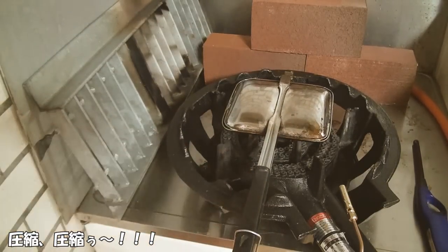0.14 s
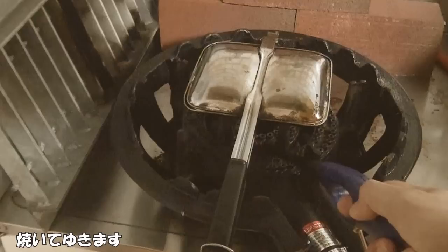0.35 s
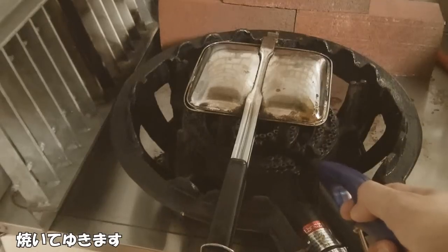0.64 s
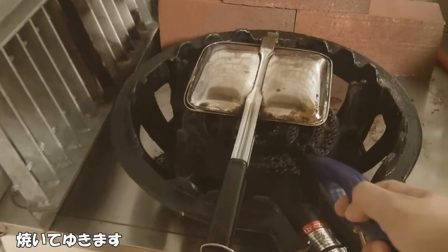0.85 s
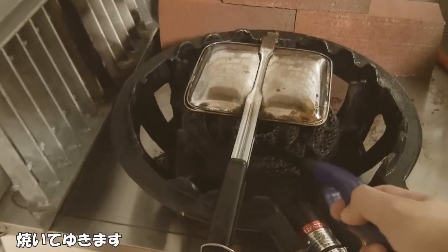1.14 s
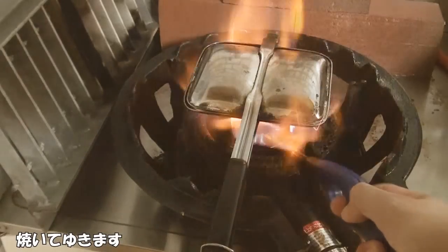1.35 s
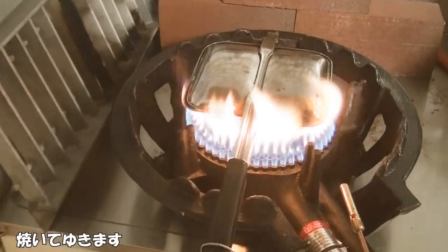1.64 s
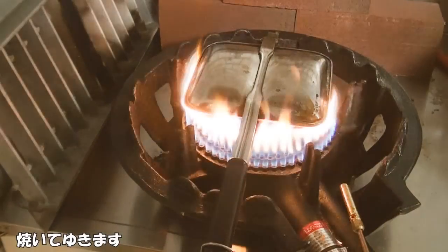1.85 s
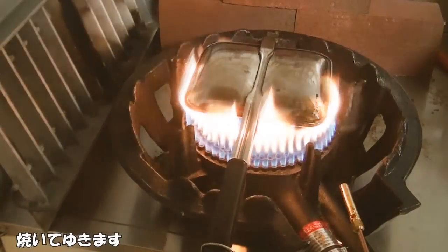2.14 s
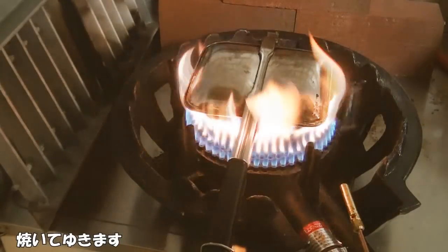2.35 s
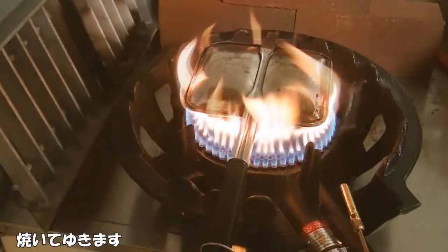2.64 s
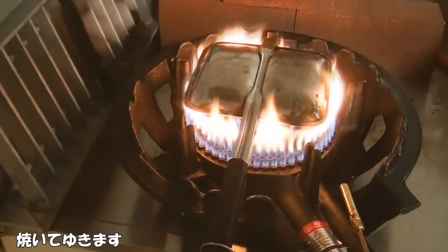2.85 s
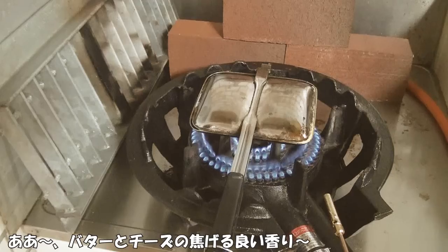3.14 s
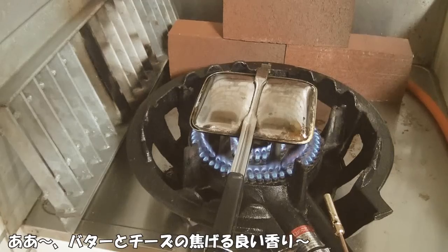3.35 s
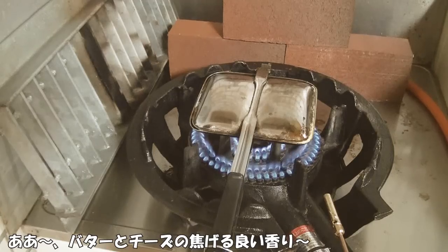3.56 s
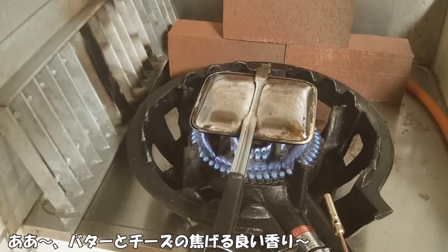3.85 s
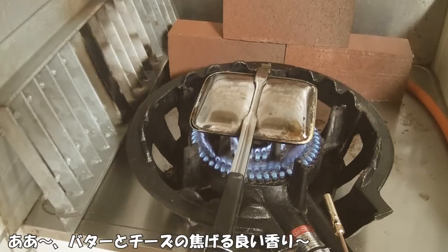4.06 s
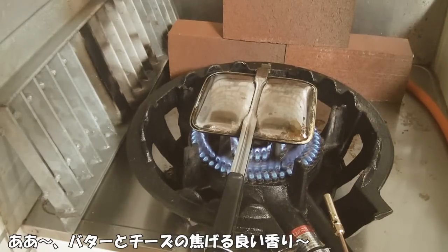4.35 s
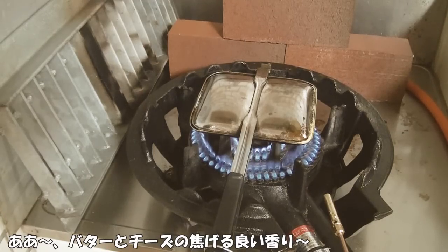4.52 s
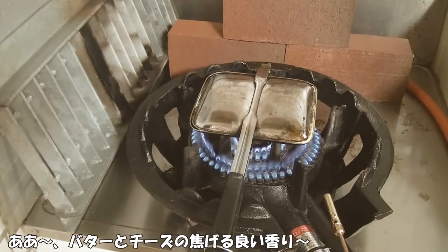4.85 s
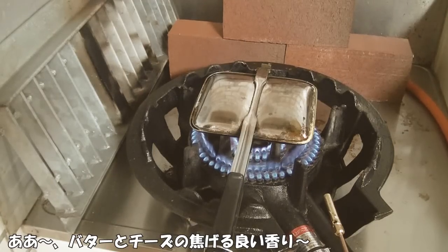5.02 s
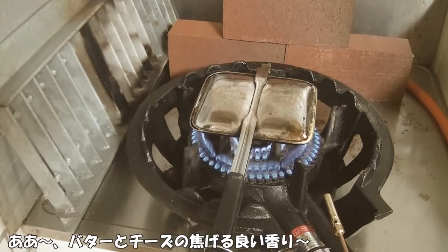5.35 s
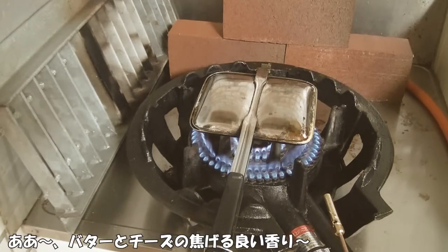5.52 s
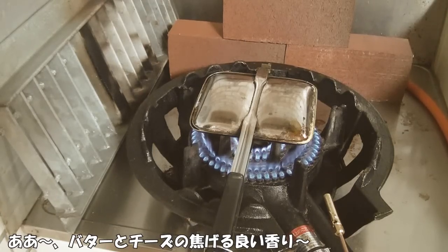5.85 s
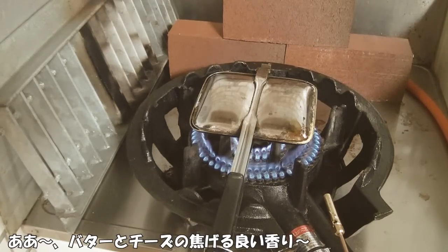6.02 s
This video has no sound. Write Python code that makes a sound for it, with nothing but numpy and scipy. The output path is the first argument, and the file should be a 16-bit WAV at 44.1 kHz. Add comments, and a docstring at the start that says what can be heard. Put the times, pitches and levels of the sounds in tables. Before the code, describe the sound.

Soft ventilation hums throughout in a steel-lined kitchen corner. At about 0.3 seconds a plastic lighter is picked up with a knock and a light rub, and gas starts hissing faintly around 0.5 seconds. The lighter snaps close by at 0.7, 1.0 and 1.3 seconds, each sharp crack leaving a short metallic echo, with small trigger clicks between. On the third snap the gas catches with a brief, deep whoomph, followed by a metal knock. From 1.7 to 2.7 seconds flames flutter in low gusts while the jet hisses and half whistles. At about 3.1 seconds fat begins sizzling in a sandwich iron, with fine crackles and irregular sharp pops, strongest near 3.9 seconds and again from 5.2 onward. Metal knocks clearly at 4.1 seconds, faintly at 4.7, and again at 6.1, as the sizzle grows slightly louder.

```python
"""A cast sandwich iron lies on a ring burner in a steel-lined kitchen corner; ventilation hums softly.
A piezo lighter is picked up with a knock, the gas starts to hiss, and the lighter snaps three times.
On the third snap the pooled gas catches with a whoomph; tall flames flutter and the jet half whistles.
From about 3 s, on a low flame, butter and cheese sizzle and spit in the iron as bubbles and drops
of fat burst, while the metal knocks now and then."""
import sys
import numpy as np
from scipy import signal
from scipy.fft import rfft, irfft, next_fast_len
from scipy.io import wavfile
from scipy.ndimage import uniform_filter1d

SR = 44100
rng = np.random.default_rng(int(sys.argv[2]) if len(sys.argv) > 2 else 0)


def materialize(psi):
    """Save the field psi as 16-bit PCM at rate SR to the path in sys.argv[1].

    A 1-D psi becomes a single channel; in a 2-D psi each row is a channel.
    """
    bounded = np.clip(np.atleast_2d(psi).T, -1, 1)
    quanta = np.round(bounded * 32767).astype(np.int16)
    wavfile.write(sys.argv[1], SR, quanta)


N = 272538

GAS_ON_S, FULL_FLAME_S, FRYING_S = .46, 1.69, 3.097
# how hard the fat is frying: (time [s], level [dB])
FRYING_STRENGTH = [(3.1, -41), (3.5, -40.5), (4.0, -37), (4.34, -42), (4.7, -38), (5.42, -40),
                   (5.85, -37.5), (6.18, -35.5)]


def lighter():
    """A tiny hammer cracks against a crystal, and the steel walls throw the sound back."""
    # hammer blows: (time [s], level [dB])
    snaps = [(0.6542, -2.5), (1.0125, -2.5), (1.3238, -2.5)]
    # tone of the crack and of its echo: (frequency [Hz], level [dB])
    crack_tone = [(570, -45), (1370, -7.5), (1640, -6.5), (2650, -2.5), (3210, -19), (3530, -4),
                  (4050, -3.5), (5870, -5.5), (8390, -6.5), (11300, -11), (12300, -20), (16000, -12)]
    echo_tone = [(550, -56), (944, -26), (1110, -13.5), (1510, -15.5), (1780, -5), (2610, -0.5),
                 (2910, -8.5), (4280, -6), (5870, -4), (7110, -8), (8860, -7.5), (12500, -21), (16000, -24)]
    # notes at which the steel rings: (frequency [Hz], level [dB])
    steel_notes = [(1927, -51), (2568, -40), (2638, -38), (4393, -34), (5335, -34), (5744, -40)]
    slap_delay_s, ring_fade_s = 0.026, 0.31
    blows = impulses(*np.transpose(snaps))
    crack = from_db(-8.5) * tint(bursts(blows, fade_s=.1), crack_tone)
    echo = from_db(20.5) * tint(kitchen(blows, build_s=0.02), echo_tone)
    # a hollow slap comes back a moment later and leaves the steel ringing
    late = np.roll(blows, int(slap_delay_s * SR))
    slap = from_db(-10) * bursts(late, fade_s=0.077) + from_db(10) * kitchen(late, build_s=0.019)
    hollow = resonate(slap, [(2020, 93, -9), (2660, 150, -9.5)])
    t = clock()[:SR]
    notes = sum(from_db(db) * np.sin(2 * np.pi * hz * t) for hz, db in steel_notes)
    ring = notes * np.minimum(t / slap_delay_s, 1) * from_db(11.5 - 60 * t / ring_fade_s)
    return off_sheets(crack + echo + hollow) + signal.fftconvolve(blows, ring)[:N]


def whoomph():
    """The pooled gas catches, blazes for a moment, collapses and leaves a low rumble."""
    # tone of the blaze: (frequency [Hz], level [dB])
    blaze_tone = [(15, -48), (25, -6), (100, -6), (140, 5.5), (232, -13.5), (296, 3.5), (365, -10),
                  (490, -7), (625, -23.5), (770, -9.5), (960, -16.5), (1600, -23), (2080, -49),
                  (3520, -120)]
    catch = dict(start_s=1.3236, rise_s=0.039, length_s=0.069)
    blaze = from_db(-11.5) * envelope(**catch, fall_db_per_s=367)
    rumble = from_db(-26) * envelope(**catch, fall_db_per_s=107)
    fire = np.hypot(blaze, rumble) * evened(tint(air(side_db=-5.5), blaze_tone), span_s=0.0155)
    # its bass piles up along the steel wall on the left
    bass = signal.sosfilt(signal.butter(1, 150, fs=SR, output="sos"), fire.mean(axis=0))
    return fire * from_db([[-.6], [.6]]) + from_db(-7.5) * bass * [[1], [-1]]


def flames():
    """Tall flames flap around the iron in short gusts."""
    # gusts: (time [s], length [s], level [dB], extra roar above 300 Hz [dB])
    gusts = [(1.682, 0.019, -39, 7), (1.809, 0.087, -40.5, -4.5), (1.913, 0.046, -33, 3),
             (2.051, 0.018, -32.5, -7), (2.33, 0.089, -40, 3.5), (2.453, 0.036, -42, -14),
             (2.521, 0.04, -36.5, -15), (2.59, 0.045, -36, 4.5)]
    # tone of the flames: (frequency [Hz], level [dB])
    flame_tone = [(15, -51), (25, -1), (53, -6), (145, 4), (179, 4.5), (216, -8), (372, -13), (532, -12),
                  (600, -25), (780, -24), (1500, -34), (5000, -46)]
    swells = np.array([from_db(db) * envelope(s, rise_s=0.014, length_s=length_s, fall_db_per_s=330)
                       for s, length_s, db, _ in gusts])
    roars = swells * from_db(np.array(gusts)[:, -1:])
    flapping = from_db(2 * drift(per_s=78))
    burning = flapping * evened(tint(air(side_db=-28), flame_tone), span_s=0.019)
    low = signal.sosfiltfilt(signal.butter(3, 300, fs=SR, output="sos"), burning)
    return swells.max(axis=0) * low + roars.max(axis=0) * (burning - low)


def frying():
    """Drops of fat pop above the sizzle, and each big one shakes the iron."""
    # big drops bursting: (time [s], level [dB], sharp treble relative to the pop [dB])
    big_drops = [(3.291, -14, -14), (3.3925, -23, 3), (3.409, -12, -9), (3.6196, -3.5, -18),
                 (3.66, -9, -15), (3.784, -14, -11), (3.8604, -0.5, -25), (3.9199, 3, -27),
                 (4.098, -3, -20), (4.174, -10, -32), (4.7907, -14, -16), (4.918, -8, -16),
                 (5.0874, -6.5, -16), (5.221, -2.5, -19), (5.291, -9, -14), (5.364, -12, -8),
                 (5.5434, -2, -7), (5.732, -3.5, -7), (5.74, -9.5, 1), (5.7808, -9, -6),
                 (5.8853, -14.5, -6), (5.9114, -7, -13), (6.0625, -10, -10), (6.112, 0, -9)]
    # tone of a pop: (frequency [Hz], level [dB])
    pop_tone = [(80, -35), (500, -20), (2000, -10), (4500, 3), (7800, 7), (11000, 2), (15500, -8.5)]
    s, db, treble_db = np.transpose(big_drops)
    big_pops = impulses(s, db)
    bubbling = sizzle(big_pops)
    drops = big_pops + crackle(big_pops)
    spatter = from_db(-19) * bursts(drops, fade_s=0.008)
    pops = from_db(-1) * tint(drops + spatter, pop_tone)
    treble = resonate(bursts(impulses(s, db + treble_db), fade_s=0.0058), [(14300, 3500, 0)])
    sharp_pops = pops + resonate(treble, [(14300, 3500, -13)])
    iron = resonate(bursts(big_pops, fade_s=0.076), [(1330, 1400, -36)])
    echo = from_db(-8.5) * kitchen(sharp_pops, build_s=0.003)
    return bubbling + off_sheets(sharp_pops) + iron + echo


def sizzle(big_pops):
    """Countless tiny bubbles burst and steam spits from the seam; each big pop lets out more."""
    # tone of the sizzle: (frequency [Hz], level [dB])
    sizzle_tone = [(300, -19), (600, -10.5), (1100, -4), (2100, -8), (2900, -1), (3800, -5.5), (5200, -6),
                   (8200, -0.5), (11200, -6.5), (12700, -7), (13600, -4.5), (16000, -6.5)]
    # pitches at which the gap in the iron rings: (frequency [Hz], width [Hz], level [dB])
    iron_gap = [(4500, 170, -4.5), (5820, 440, -5), (7480, 150, -6), (8350, 140, -3.5), (9980, 200, -7)]
    steam = from_db(-34.5) * die_away(big_pops, fade_s=0.19)
    strength = np.hypot(level(FRYING_STRENGTH) * after(FRYING_S), steam)
    sizes = from_db(6.3 * np.minimum(rng.exponential(1, N), 5)) * rng.choice([-1, 1], N)
    bubbles_per_s = 1000 * from_db(3 * drift(per_s=45))
    bubbles = rms_one(sizes * (rng.random(N) < bubbles_per_s / SR))
    # steam lets go at uneven intervals, in puffs that swell and fade within milliseconds
    spit_s = np.cumsum(rng.uniform(.003, .035, 500))
    spit_s = spit_s[spit_s < N / SR]
    releases = impulses(spit_s, rng.uniform(-12, 0, len(spit_s)))
    decay = np.exp(-1 / (0.0015 * SR))
    puffs = signal.lfilter([1], [1, -2 * decay, decay * decay], releases + 1e-18)
    spits = rms_one(puffs * air(side_db=-10))
    fizz = strength * (from_db(-4) * bubbles + from_db(-6.5) * spits + from_db(-5) * air(side_db=-1))
    return from_db(-3) * off_sheets(tint(fizz, sizzle_tone)) + from_db(-8.5) * resonate(fizz, iron_gap)


def crackle(big_pops):
    """Small drops burst in loose clusters and around each big pop, louder as the frying grows."""
    # pitches of the small drops: (frequency [Hz], width [Hz], level [dB])
    pitches = [(3200, 1200, 1.5), (5400, 1800, -6), (8600, 4100, 4.5), (13800, 3000, -30)]
    drops_per_s, flurry_per_s, flurry_s = 85, 310, 0.01
    strength = after(FRYING_S) * rms_one(level(FRYING_STRENGTH))
    near_big_pop = uniform_filter1d((big_pops > 0) * 1.0, int(flurry_s * SR)) > 1e-9
    rate = drops_per_s * from_db(2.5 * drift(per_s=35)) + flurry_per_s * near_big_pop
    out = 0
    for pitch in pitches:
        bursting = rng.random(N) < rate / len(pitches) / SR
        sizes = from_db(-20 - 9 * rng.random(N))
        out = out + resonate(strength * bursting * sizes, [pitch])
    return out


def knocks():
    """Knocked metal gives a dull thud, a tick and a brief ring whose pitch depends on the spot."""
    # knocks: (time [s], level [dB], bottom of the ring [Hz], top of the ring [Hz],
    # relative echo [dB], relative thud [dB], relative tick [dB])
    hits = [(0.3208, -6.5, 1170, 1930, -3, -16.5, -9.5), (1.437, -6.5, 2670, 3560, 3, -12.5, -10),
            (3.956, -21, 760, 1300, 5, -11, -15), (4.1308, 0, 2150, 2920, -1.5, -15, -17),
            (4.724, -20, 930, 1330, 6, -11, -17), (6.111, -7, 795, 1180, 1, -9, 1)]
    # tone of the thud and of the tick: (frequency [Hz], level [dB])
    thud_tone = [(35, -45), (110, -12), (190, 4.5), (270, -3.5), (450, 6), (620, -1), (850, 0.5),
                 (1500, -29), (3000, -19.5)]
    tick_tone = [(80, -32), (300, -7), (1200, -2), (2100, 6.5), (2800, -5), (3400, 3.5), (4200, -3),
                 (5600, 1.5), (7100, -6), (7800, 6), (8800, -7), (14000, -21)]
    # the metal rings out at once, the room answers for longer
    strike = impulses([0], 0)
    direct = strike + from_db(-17) * bursts(strike, fade_s=0.055)
    echo = kitchen(strike, build_s=0.002)
    rings = 0
    for start_s, ring_db, low_hz, high_hz, echo_db, _, _ in hits:
        band = np.vstack([signal.butter(4, low_hz, "high", fs=SR, output="sos"),
                          signal.butter(16, high_hz, fs=SR, output="sos")])
        blow = (direct + from_db(echo_db) * echo)[:, :SR // 2]
        gain = from_db(ring_db) * np.sqrt(SR / 2 / (high_hz - low_hz))
        ring = gain * signal.sosfilt(band, blow + 1e-18)
        rings = rings + np.pad(ring, ((0, 0), (int(start_s * SR), N)))[:, :N]
    s, db, _, _, _, thud_db, tick_db = np.transpose(hits)
    thud = from_db(-5) * tint(bursts(impulses(s, db + thud_db), fade_s=0.061).mean(axis=0), thud_tone)
    tick = from_db(-6.5) * tint(bursts(impulses(s, db + tick_db), fade_s=0.036), tick_tone)
    return rings + thud + tick + from_db(-10.5) * kitchen(tick + thud, build_s=0.0022)


def small_clicks():
    """The lighter's trigger and other small things click, each with a short hollow note."""
    # clicks: (time [s], level [dB], hollow note relative to the click [dB])
    clicks = [(0.4644, -21, -16.5), (0.841, -14, -19), (0.8732, -23.5, -11), (1.173, -17, -18.5),
              (1.18, -13.5, -18), (1.487, -15, -22.5), (1.5567, -26, -41), (2.6073, -35.5, -3.5),
              (6.171, -38, 7)]
    # tone of a click: (frequency [Hz], level [dB])
    click_tone = [(590, -23), (1000, -33), (1750, 0), (2030, 1.5), (3800, -0.5), (5440, 2), (8360, -7.5),
                  (10100, -10.5), (16000, -30)]
    s, db, hollow_db = np.transpose(clicks)
    click = from_db(-7.5) * tint(bursts(impulses(s, db), fade_s=0.043), click_tone)
    hollow = resonate(bursts(impulses(s, db + hollow_db), fade_s=0.068), [(975, 520, 1.1)])
    return click + hollow + from_db(-7) * kitchen(click + hollow, build_s=0.011)


def handling():
    """Skin slides over the plastic lighter and grips it; light pushes make something hollow hum."""
    # tone of the rubbing: (frequency [Hz], level [dB])
    rub_tone = [(400, -10), (900, -6), (2000, -3.5), (4000, -7.5), (7000, -5), (10000, -12.5), (13000, -27)]
    # pushes on the lighter: (time [s], length [s], level [dB], pitch [Hz])
    pushes = [(0.264, 0.017, -45, 240), (0.315, 0.0096, -39, 253), (0.865, 0.068, -47.5, 365.5),
              (1.185, 0.027, -48, 355)]
    slide_s, grip_s, rise_db_per_s, fall_db_per_s = 0.057, 0.32, 210, 170
    slide = from_db(-49) * envelope(slide_s, 0.068, grip_s - slide_s, fall_db_per_s)
    t = clock() - grip_s
    grip = from_db(-34.5 + np.minimum(rise_db_per_s * t, -fall_db_per_s * t))
    rub = np.hypot(slide, grip) * tint(air() * from_db(2.5 * drift(per_s=250.5)), rub_tone)
    hums = 0
    for s, length_s, db, hz in pushes:
        push = envelope(s, rise_s=0.0088, length_s=length_s, fall_db_per_s=169)
        hums = hums + push * hum(hz, db, waver=1.04 * drift(per_s=100))
    return rub + hums


def gas():
    """The jet hisses and half whistles, most of all while the valve is wide open."""
    # tone of the burner's hiss: (frequency [Hz], level [dB])
    hiss_tone = [(180, -67), (300, -20), (360, -8.5), (440, -18), (689, -6), (1300, -10), (2400, -6),
                 (2930, -16), (4230, -13), (7000, -15), (7950, -16.5), (16000, -29)]
    # whistles of the jet: (frequency [Hz], width [Hz], level [dB])
    jet_pitches = [(742, 300, -0.5), (7300, 270, -3), (8550, 1100, -4)]
    barely_open = after(GAS_ON_S) * (1 - after(FULL_FLAME_S))
    wide_open = after(FULL_FLAME_S) * (1 - after(FRYING_S))
    hiss = after(GAS_ON_S) * from_db(-52) * tint(air(), hiss_tone)
    whistles = 0
    for hz, width_hz, db in jet_pitches:
        band = [(hz, width_hz, 0)]
        whistles = whistles + from_db(db) * rms_one(resonate(resonate(air(), band), band))
    thin_whistle = barely_open * resonate(air(), [(8380, 170, -58.5)])
    return off_sheets(hiss) + from_db(-52.5) * wide_open * whistles + thin_whistle


def ventilation():
    """A soft rush of air with a few wavering hums."""
    # tone of the rush, and the hums: (frequency [Hz], level [dB])
    rush_tone = [(25, -23), (62, -4), (95, -10), (190, -7.5), (700, -10), (1400, -14.5), (2300, -13),
                 (3000, -17.5), (9000, -21.5), (15500, -28)]
    hum_notes = [(236.9, -61.5), (296, -66), (468.3, -67)]
    hums = sum(hum(hz, db, waver=0.47 * drift(per_s=12)) for hz, db in hum_notes)
    return from_db(-51.5) * tint(air(), rush_tone) + hums


def off_sheets(x):
    """Add the first bounces off nearby steel sheets, which make a sound slightly metallic."""
    # bounces: (delay [s], strength [ratio])
    bounces = [(.0037, 0.12), (.0061, 0.17)]
    return x + sum(gain * np.pad(x, ((0, 0), (int(delay_s * SR), 0)))[:, :N] for delay_s, gain in bounces)


def kitchen(x, build_s):
    """The room's echo thickens over build_s, then each band of pitches fades at its own speed."""
    # length of the echo: (frequency [Hz], time to fade by 60 dB [s])
    fade_times = [(150, 0.63), (1000, 0.4646), (2500, 0.27), (5000, 0.3743), (8000, 0.2435), (14000, 0.33)]
    size = 24000
    t, hz = np.arange(size) / SR, np.fft.rfftfreq(size, 1 / SR)
    white, centres = rfft(air(size)), np.geomspace(150, 14000, num=8)
    echo = 0
    for centre, share in zip(centres, np.eye(len(centres))):
        band = irfft(white * np.interp(hz, centres, share))
        echo = echo + band * from_db(-60 * t / at_hz(fade_times, centre))
    echo = rms_one(echo * (1 - np.exp(-t / build_s))) / np.sqrt(size)
    return signal.fftconvolve(np.atleast_2d(x).mean(axis=0)[None], echo, axes=-1)[:, :N]


def air(size=N, side_db=0):
    """White noise in stereo; a lower side_db makes it narrower, for a near source."""
    # stereo width: (frequency [Hz], left-right difference relative to the middle [dB])
    stereo_width = [(100, -19), (350, -8.5), (1200, -11), (2800, -11.5), (5000, -10), (8500, -16),
                    (14000, -42.5)]
    padded = next_fast_len(size)
    mid, side = rng.standard_normal((2, padded))
    side_gain = from_db(side_db + at_hz(stereo_width, np.fft.rfftfreq(padded, 1 / SR)))
    side = irfft(rfft(side) * side_gain, padded)
    return np.array([mid + side, mid - side])[:, :size]


def from_db(db):
    """Turn decibels into a multiplier."""
    return 10 ** (np.asarray(db) / 20)


def rms_one(x):
    """Scale to an average (rms) level of 1."""
    return x / np.sqrt(np.mean(x ** 2) + 1e-20)


def clock():
    """Time of each sample in seconds."""
    return np.arange(N) / SR


def level(rows):
    """A volume curve through (time [s], level [dB]) rows."""
    return from_db(np.interp(clock(), *np.transpose(rows)))


def after(s):
    """A quick fade in at time s."""
    return np.clip((clock() - s) * 250, 0, 1)


def envelope(start_s, rise_s, length_s, fall_db_per_s):
    """A volume curve that rises at start_s and begins to fall length_s later."""
    t = clock() - start_s
    return np.clip(t / rise_s, 0, 1) ** 2 * from_db(-np.clip((t - length_s) * fall_db_per_s, 0, 200))


def at_hz(points, hz):
    """Read between a table's rows on a log-frequency scale."""
    row_hz, value = np.transpose(sorted(points))
    return np.interp(np.log(hz + 1), np.log(row_hz), value)


def tint(x, tone):
    """Give x this tone; white noise would keep its power."""
    size = 4096
    gain = rms_one(from_db(at_hz(tone, np.fft.rfftfreq(size, 1 / SR))))
    # a minimum-phase filter: nothing sounds ahead of a click
    cepstrum = irfft(np.log(gain))
    cepstrum[1:size // 2] *= 2
    cepstrum[size // 2 + 1:] = 0
    response = irfft(np.exp(rfft(cepstrum)))
    return signal.fftconvolve(np.atleast_2d(x), response[None], axes=-1)[:, :x.shape[-1]]


def resonate(x, peaks):
    """Let x ring at each (frequency [Hz], width [Hz], level [dB]) peak."""
    out = 0
    for hz, width_hz, db in peaks:
        r = np.exp(-np.pi * width_hz / SR)
        feedback = [1, -2 * r * np.cos(2 * np.pi * hz / SR), r * r]
        ring = signal.lfilter([1, 0, -1], feedback, x + 1e-18)
        out = out + from_db(db) * np.sqrt((1 - r * r) / 2) * ring
    return out


def drift(per_s):
    """A random wander, about 1 in size, that turns per_s times a second."""
    turns = rng.standard_normal(int(N / SR * per_s) + 2)
    return rms_one(np.interp(clock() * per_s, np.arange(len(turns)), turns))


def hum(hz, db, waver):
    """A pure note, made unsteady by waver (in radians)."""
    return from_db(db) * np.sqrt(2) * np.sin(2 * np.pi * hz * clock() + waver)


def evened(x, span_s):
    """Hold the level near 1 over every stretch of span_s."""
    return x / np.sqrt(uniform_filter1d(np.mean(x ** 2, axis=0), int(span_s * SR)) + 1e-9)


def impulses(times, db):
    """One click per event."""
    out = np.zeros(N)
    out[(np.asarray(times) * SR).astype(int)] = from_db(db)
    return out


def die_away(clicks, fade_s):
    """Give each click a tail that drops 60 dB in fade_s."""
    return signal.lfilter([1], [1, -from_db(-60 / (fade_s * SR))], clicks + 1e-18)


def bursts(clicks, fade_s):
    """Each click sets off a fading burst of noise."""
    return air() * die_away(clicks, fade_s)


def scene():
    """All the sources together."""
    lighting = lighter() + small_clicks() + handling()
    return lighting + knocks() + whoomph() + flames() + gas() + frying() + ventilation()


def record(dry):
    """Round off the tallest peaks and cut the highest treble."""
    cutoff_hz = 15900
    rounded = 1.497 * np.tanh(dry / 1.297)
    low_pass = signal.firwin(301, cutoff_hz, fs=SR)
    return signal.fftconvolve(rounded, low_pass[None], mode="same", axes=-1)


dry = scene()
out = record(dry)
materialize(out)
```